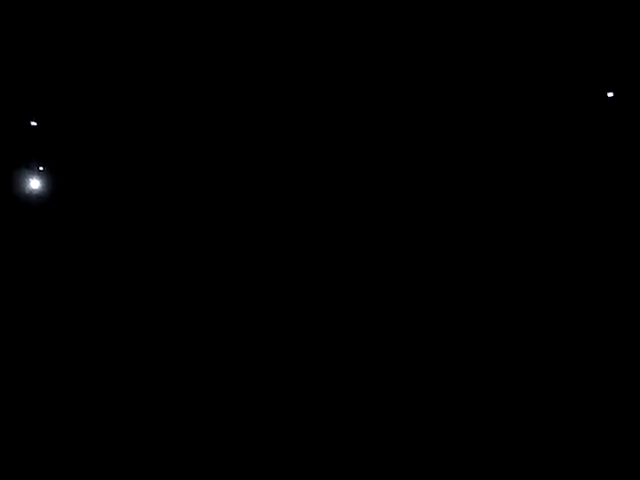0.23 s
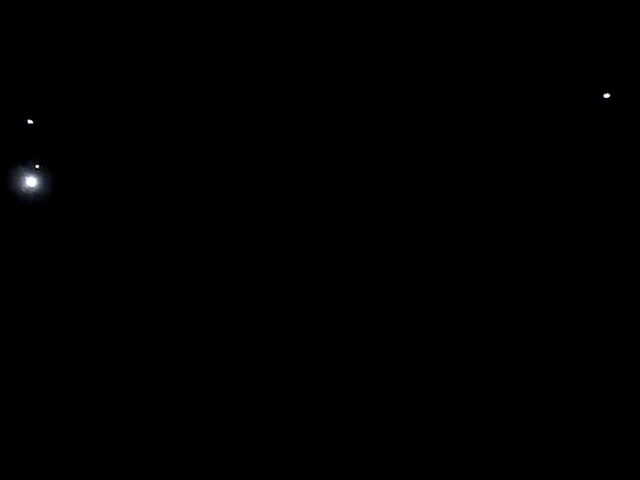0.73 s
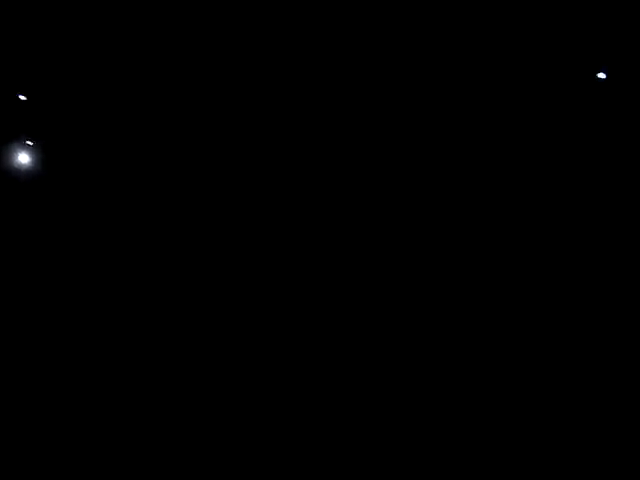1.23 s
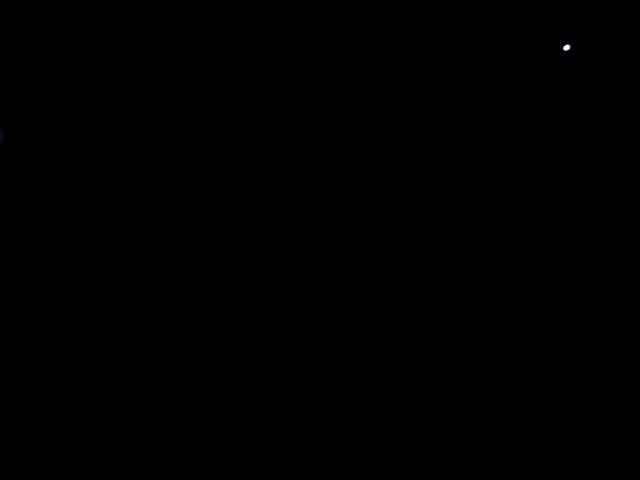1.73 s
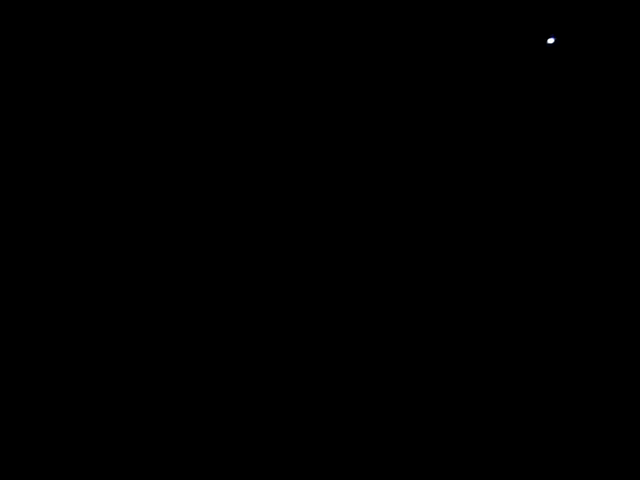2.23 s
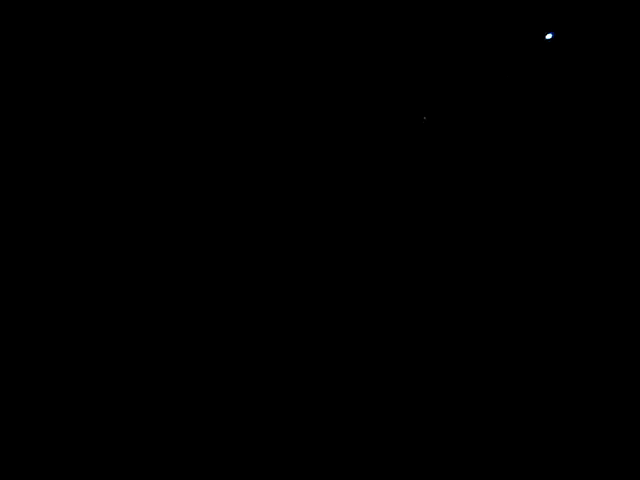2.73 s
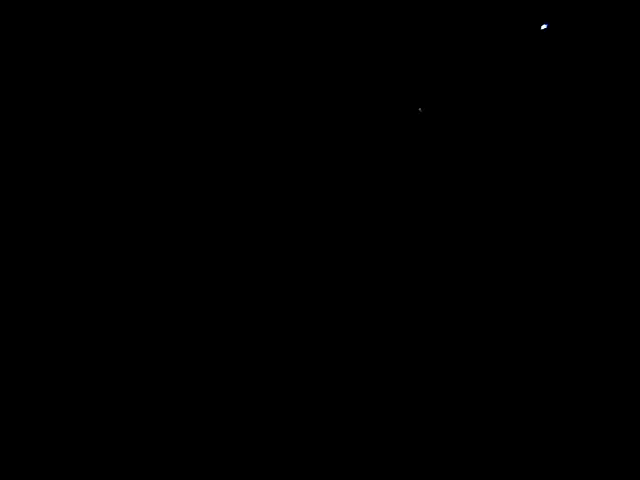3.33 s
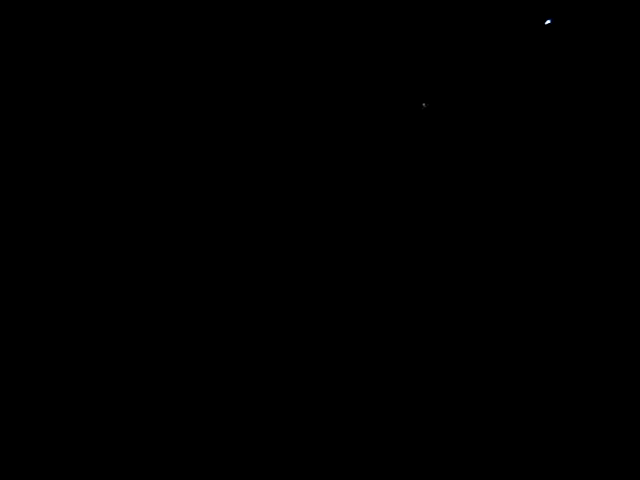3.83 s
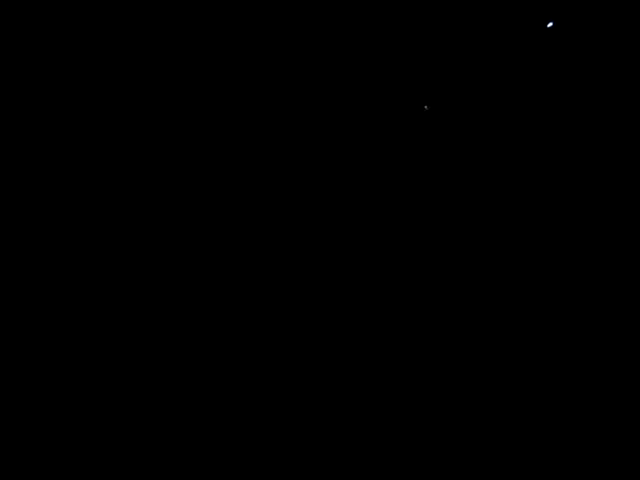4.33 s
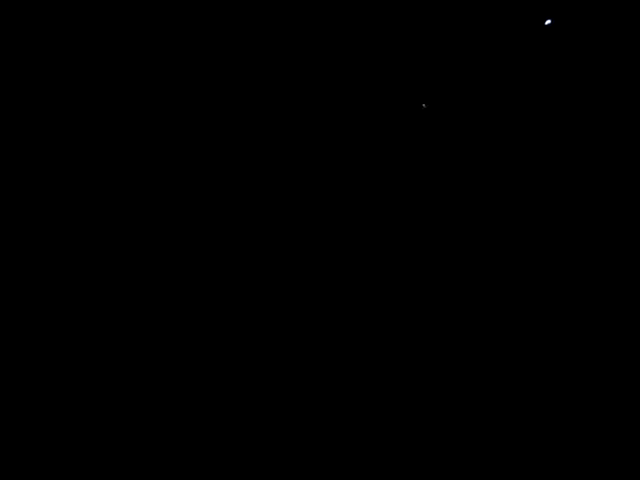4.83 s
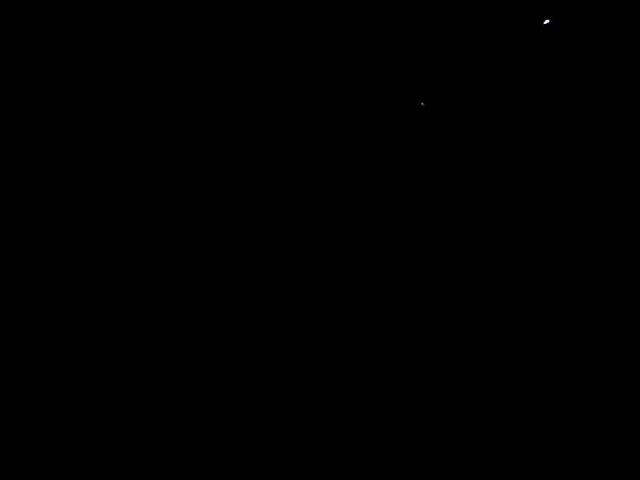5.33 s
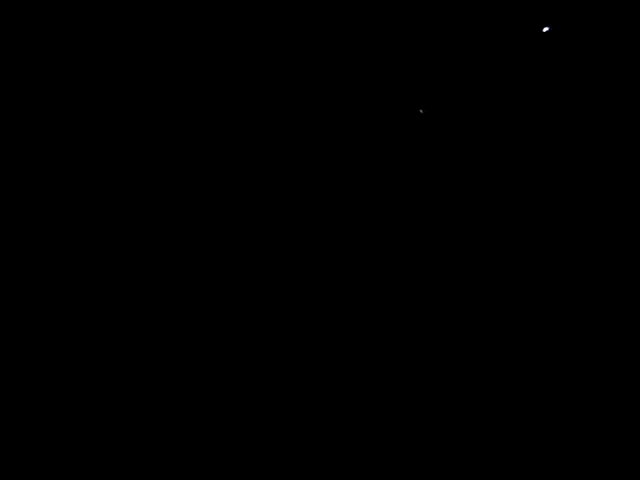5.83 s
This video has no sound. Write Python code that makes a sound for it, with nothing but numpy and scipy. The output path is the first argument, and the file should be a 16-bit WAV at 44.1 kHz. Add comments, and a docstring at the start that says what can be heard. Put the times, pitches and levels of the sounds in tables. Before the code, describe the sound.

High, thin songbird whistles grow louder and break into rapid fluted notes and harsh falling chips, echoing over faint night hiss.

```python
"""Among trees at night, a nightingale sings one strophe: thin whistles that swell and flatten, then a
loud burst of fluted notes and sharp downward chips. Its syrinx is an oscillator of gliding pitch,
and trunks and leaves scatter every note into reverberation. Brief recorder dropouts cut the
whistles and their echoes together. Under the song lie a faint far rumble and hiss, two distant
calls and a few small ticks close by."""
import sys
import numpy as np
from scipy import signal
from scipy.fft import rfft, irfft
from scipy.io import wavfile
from scipy.ndimage import uniform_filter1d

SR = 44100
rng = np.random.default_rng(int(sys.argv[2]) if len(sys.argv) > 2 else 0)


def generate_wav(sig):
    """Save sig (samples, or channels by samples) to the path in sys.argv[1] as 16-bit PCM at SR."""
    pcm = np.round(np.clip(np.atleast_2d(sig).T, -1, 1) * 32767).astype(np.int16)
    wavfile.write(sys.argv[1], SR, pcm)


N = 268260

# Levels in the tables are relative: each source applies its own gain.
# spectrum of the night air: (frequency [Hz], spectral level [dB])
AIR_SPECTRUM = [(15, -54), (25, -20), (85, -8.5), (118, -7.5), (195, -3.5), (257, -4.5), (307, -3),
                (394, -3.5), (519, -6), (651, -4), (3000, -16.5), (3760, -17.5), (6370, -20.5),
                (7780, -22.5), (10000, -27), (13000, -61.5), (22000, -120)]
# narrow bands that stand out of it: (centre [Hz], width [Hz], lift [dB])
DRONES = [(317, 14, 4), (516, 18, 5.5), (805, 50, 3), (7580, 110, 4.5)]
# reverberation of the trees: (frequency [Hz], time to decay by 60 dB [s])
GROVE_DECAY = [(1400, .42), (2500, 0.6), (4000, 0.65), (6000, 0.55), (9000, 0.5)]
# small snaps: (time [s], peak level [dB], treble tilt [dB/octave])
TICKS = [(0.2583, -37, 0.5), (0.4404, -28, 0), (0.832, -40.5, -9), (0.9414, -40.5, -4), (1.7447, -35, 1),
         (1.894, -39, 0), (2.8868, -35, 1.5), (3.032, -39, -1), (3.15, -36, 5), (3.316, -41, -8),
         (3.7548, -39, 0)]
# their spectrum: (frequency [Hz], level [dB])
TICK_SPECTRUM = [(300, -28), (950, -14), (1350, 1.5), (2700, -5), (4000, -16), (6500, -14), (10000, -26)]
# fluted notes: (time [s], length [s], start pitch [Hz], end pitch [Hz], glide time constant [s],
# loudest point [share of length], level [dB])
FLUTED_NOTES = [(4.258, .022, 1950, 1870, .03, .5, -41), (4.278, .025, 1880, 1490, .05, .55, -22.5),
                (4.301, .023, 1440, 1290, .03, .6, -31), (4.42, .035, 3050, 3090, .009, .55, -26),
                (4.457, .032, 3100, 3100, .009, .6, -24), (4.459, .03, 2470, 2560, .03, .5, -13),
                (4.501, .026, 2420, 2530, .015, .5, -11), (4.534, .041, 2420, 2550, .03, .5, -12),
                (4.57, .043, 2520, 2465, .009, .55, -12), (4.726, .06, 4140, 4095, .04, .72, -24.5),
                (4.843, .056, 1420, 2230, .02, .6, -19), (4.891, .015, 1950, 1350, .03, .45, -24.5),
                (4.954, .076, 2920, 2478, .009, .42, -12), (5.079, .012, 1780, 1460, .02, .5, -28),
                (5.101, .012, 1780, 1460, .02, .5, -29), (5.123, .012, 1780, 1460, .02, .5, -28)]
# distant peeps, one distant rasp and the nasal squeak: columns as for the fluted notes
FAR_PEEPS = [(1.07, .025, 2530, 2520, .02, .5, -58), (1.082, .1, 3720, 3690, .02, .5, -57.5)]
FAR_RASP = (1.843, .072, 3000, 2850, .04, .4, -54)
SQUEAK = (4.255, .027, 900, 960, .009, .5, -35)
# harmonics of the squeak: (harmonic number, level [dB])
SQUEAK_HARMONICS = [(3, -0.5), (4, -8.5), (5, -17.5), (6, -22.5), (7, -22), (8, -29), (10, -30)]
# faint rasps among the whistles: (time [s], level [dB])
SCRAPES = [(2.682, -58), (3.183, -54), (3.525, -49), (3.76, -51)]
# thin whistles: (time [s], length [s], start pitch [Hz], top pitch [Hz], climb [share of length],
# bend [exponent], level [dB], swell [dB], final flutter [share of pitch])
WHISTLES = [(1.40, .125, 6400, 6680, .98, 1.0, -57.5, 9, .006),
            (1.526, .141, 6700, 7540, .8, 2.0, -44.5, 2, .026),
            (2.128, .342, 6170, 7400, .92, 1.4, -37.5, 12, .026),
            (2.722, .26, 6150, 6820, .95, 2.4, -27, 13, .028),
            (3.183, .36, 6120, 6370, .56, 1.8, -23, 15, .012),
            (3.757, .381, 6060, 6440, .68, 1.4, -23, 12, .016)]
# recorder dropouts that cut the whistles and their echoes: (time [s], length [s])
DROPOUTS = [(2.78, .008), (2.977, .007), (3.291, .017), (3.317, .01), (3.387, .02), (3.414, .008),
            (3.515, .015), (3.664, .022), (3.747, .011), (4.028, .008), (4.081, .009), (4.141, .011)]
# sharp chips: (time [s], length [s], top pitch [Hz], end pitch [Hz], level [dB], change in the dive [dB])
CHIPS = [(4.777, .039, 5850, 5100, -22, 0), (5.201, .055, 5650, 2650, -18, -2),
         (5.314, .046, 5480, 2900, -18.3, -5.5)]


def gain_of(db):
    """Amplitude ratio: a factor of ten for every 20 dB."""
    return 10 ** (np.asarray(db) / 20)


def unit_rms(x):
    """Normalisation to unit mean power."""
    return x / np.sqrt(np.mean(x ** 2) + 1e-20)


def curve_at(points, hz):
    """Interpolation on a logarithmic frequency axis."""
    f, value = np.transpose(points)
    return np.interp(np.log(hz + 1), np.log(f + 1), value)


def wander(rate_hz):
    """Random modulation: low-pass Gaussian noise of rms 1."""
    hz = np.fft.rfftfreq(N, 1 / SR)
    return unit_rms(irfft(rfft(rng.standard_normal(N)) * np.exp(-(hz / rate_hz) ** 2), N))


def band(x, lo_hz, hi_hz, order):
    """Causal band-pass filtering."""
    return signal.sosfilt(signal.butter(order, [lo_hz, hi_hz], "band", fs=SR, output="sos"), x)


def night_air(level_db=-53, swell_db=.18):
    """Spectrally shaped noise: a steady far rumble and hiss with a few narrow drones."""
    hz = np.fft.rfftfreq(N, 1 / SR)
    drones_db = sum(lift * np.exp(-((hz - f) / width) ** 2) for f, width, lift in DRONES)
    spectrum = rfft(rng.standard_normal(N)) * gain_of(curve_at(AIR_SPECTRUM, hz) + drones_db)
    return gain_of(level_db + swell_db * wander(2.1)) * unit_rms(irfft(spectrum, N))


def ticks(snap_s=.0017, rustle_s=.012, rustle_db=-22):
    """Broadband transients with exponential decay: each a dry snap and a brief rustle."""
    out, t, hz = np.zeros(N), np.arange(2048) / SR, np.fft.rfftfreq(2048, 1 / SR)
    envelope = np.exp(-t / snap_s) + gain_of(rustle_db) * np.exp(-t / rustle_s)
    treble_octaves = np.clip(np.log2((hz + 1) / 1500), 0, 2)
    for start, db, tilt in TICKS:
        snap = np.roll(rng.standard_normal(len(t)) * envelope, SR // 1000)
        snap = irfft(rfft(snap) * gain_of(curve_at(TICK_SPECTRUM, hz) + tilt * treble_octaves))
        at = round(start * SR)
        out[at:at + len(snap)] += gain_of(db) * snap / abs(snap).max()
    return out


def grove(x, tail_db, near_db, near_s, gap_s):
    """Scattering: direct sound, quick echoes from near branches and, after a gap, a tail from trunks."""
    t = np.arange(SR) / SR
    far_echoes = rng.standard_normal(SR) * (rng.random(SR) < 3000 / SR) * (t > gap_s)
    hz, frame_s, spectra = signal.stft(far_echoes, SR, nperseg=256)
    decay = gain_of(-60 * frame_s / curve_at(GROVE_DECAY, hz)[:, None])
    tail = signal.istft(spectra * decay, SR, nperseg=256)[1][:SR]
    near_echoes = rng.choice([-1., 1.], SR) * (rng.random(SR) < 600 / SR) * (t > .002)
    near = near_echoes * np.exp(-t / near_s)
    response = gain_of(tail_db) * tail / np.linalg.norm(tail)
    response += gain_of(near_db) * near / np.linalg.norm(near)
    return x + signal.fftconvolve(x, response)[:N]


def syrinx(contours, harmonics, jitter, jitter_hz, shimmer_db, edge_s):
    """Harmonic oscillation along each contour, randomly modulated in pitch (jitter) and level (shimmer)."""
    out = np.zeros(N)
    tremble, shimmer = jitter * wander(jitter_hz), shimmer_db * wander(jitter_hz)
    for times, hz, db in contours:
        at = np.arange(round(times[0] * SR), round(times[-1] * SR))
        t = at / SR
        phase = 2 * np.pi * np.cumsum(np.interp(t, times, hz) * (1 + tremble[at])) / SR
        to_edge_s = np.minimum(t - times[0], times[-1] - t)
        gate = np.sin(np.pi / 2 * np.clip(to_edge_s / edge_s, 0, 1)) ** 2
        tone = sum(gain_of(harmonic_db) * np.sin(k * phase) for k, harmonic_db in harmonics)
        out[at] += np.sqrt(2) * gate * gain_of(np.interp(t, times, db) + shimmer[at]) * tone
    return out


def note_contour(start, length, start_hz, end_hz, glide_s, loudest, db, ends_db=-11):
    """Exponential relaxation of pitch under one arch of level; gives times, pitch and level."""
    u = np.linspace(0, 1, 64)
    glide = 1 - np.exp(-u * length / glide_s)
    hz = start_hz + (end_hz - start_hz) * glide / glide[-1]
    arch = np.sin(np.pi * np.interp(u, [0, loudest, 1], [0, .5, 1]))
    return start + length * u, hz, db + ends_db * (1 - arch)


def far_calls():
    """Depth of frequency modulation sets two distant calls apart: shallow in a peep, deep in a rasp."""
    peeps = [note_contour(*row) for row in FAR_PEEPS]
    peep = syrinx(peeps, [(1, 0)], jitter=.008, jitter_hz=200, shimmer_db=2.2, edge_s=.01)
    rasp = syrinx([note_contour(*FAR_RASP)], [(1, 0)],
                  jitter=.096, jitter_hz=600, shimmer_db=3, edge_s=.0076)
    return gain_of(-5) * grove(peep + rasp, tail_db=-5, near_db=-4, near_s=.02, gap_s=.01)


def scrapes(length_s=.025, hz=5680):
    """Rapid jitter roughens short tones just under the pitch of the whistles."""
    notes = [note_contour(start, length_s, hz, hz, length_s, .5, db) for start, db in SCRAPES]
    voice = syrinx(notes, [(1, 0)], jitter=.02, jitter_hz=400, shimmer_db=2.2, edge_s=.003)
    return grove(voice, tail_db=-3, near_db=-3, near_s=.05, gap_s=.015)


def whistle_contour(start, length, start_hz, top_hz, climb, bend, db, swell_db):
    """Power-law glide and envelope: a whistle climbs and swells, then sags and fades."""
    loudest, fade_db, sag_hz_per_s = .71, -6, 900
    u = np.linspace(0, 1, 64)
    rise_hz = (top_hz - start_hz) * np.minimum(u / climb, 1) ** bend
    sag_hz = sag_hz_per_s * length * np.maximum(u - climb, 0)
    before, after = np.maximum(1 - u / loudest, 0), np.maximum(u - loudest, 0) / (1 - loudest)
    level_db = db - swell_db * before ** 1.5 + fade_db * after ** 2
    return start + length * u, start_hz + rise_hz - sag_hz, level_db


def fraying(clean=.0055):
    """Depth of frequency modulation, as a share of pitch: it grows through each whistle."""
    t, flutter = np.arange(N) / SR, np.full(N, clean)
    for start, length, *_, frayed in WHISTLES:
        u = np.clip((t - start) / length, 0, 1)
        flutter += (frayed - clean) * u ** 2.8 * (u < 1)
    return flutter


def dropouts(depth=.97, random_per_s=6, mean_random_s=.005):
    """Amplitude gating: the recorder's gain drops out briefly, at the listed times and at random."""
    t, gain = np.arange(N) / SR, np.ones(N)
    random_dropouts = [((k + place) / random_per_s, mean_random_s * (.5 + size))
                       for k, (place, size) in enumerate(rng.random(size=(80, 2)))]
    for centre, length in DROPOUTS + random_dropouts:
        near = slice(*np.searchsorted(t, [centre - length, centre + length]))
        gain[near] *= 1 - depth * np.exp(-(2 * (t[near] - centre) / length) ** 6)
    return gain


def whistles():
    """Resonance and interference: thin tones pass a tightly tuned throat and beat against their echoes."""
    notes = [whistle_contour(*row[:-1]) for row in WHISTLES]
    voice = syrinx(notes, [(1, 0)], jitter=fraying(), jitter_hz=340, shimmer_db=1.9, edge_s=.0017)
    voice = band(voice, 5800, 8400, order=6) + gain_of(-23.5) * voice
    return gain_of(-3) * grove(voice, tail_db=-6, near_db=-5, near_s=.053, gap_s=.015) * dropouts()


def chip_contour(start, length, top_hz, end_hz, db, dive_db):
    """A frequency sweep under one arch of level: a small upward hook, then a steep dive."""
    hook_hz, ends_db, dive_from, dive_to = 400, -8, .29, .93
    u = np.linspace(0, 1, 64)
    hook = np.maximum(1 - u / dive_from, 0) ** 2
    dive = np.sin(np.pi / 2 * np.clip((u - dive_from) / (dive_to - dive_from), 0, 1)) ** 2
    arch = np.sin(np.pi * u ** 1.05)
    hz = top_hz - hook_hz * hook + (end_hz - top_hz) * dive
    return start + length * u, hz, db + ends_db * (1 - arch) + dive_db * dive


def roughen(x, width_hz, noise_share):
    """Chaotic vibration spreads a tone into sidebands that follow its pitch."""
    low_pass = 1 / (1 + (2 * np.fft.fftfreq(N, 1 / SR) / width_hz) ** 8)
    chaos = np.fft.ifft((rng.standard_normal(N) + 1j * rng.standard_normal(N)) * low_pass)
    sidebands = (signal.hilbert(x) * chaos / chaos.std()).real
    return np.sqrt(1 - noise_share) * x + np.sqrt(noise_share) * sidebands


def chips():
    """Noise modulation makes harsh plunges: a diving, rasping band, with hiss that follows its envelope."""
    notes = [chip_contour(*row) for row in CHIPS]
    voice = syrinx(notes, [(1, -1), (2, -34)], jitter=.022, jitter_hz=600, shimmer_db=1.5, edge_s=.0025)
    voice = roughen(voice, width_hz=1500, noise_share=.8)
    envelope = np.sqrt(abs(uniform_filter1d(voice ** 2, size=200)))
    hiss = gain_of(-23) * envelope * unit_rms(band(rng.standard_normal(N), 2600, 12000, order=2))
    return gain_of(-3) * grove(voice + hiss, tail_db=-4.5, near_db=-3.5, near_s=.024, gap_s=.021)


def fluted_burst():
    """Harmonic balance sets timbre: an overtone-rich nasal squeak opens a run of round, near-pure notes."""
    flutes = syrinx([note_contour(*row) for row in FLUTED_NOTES], [(1, -2.5), (2, -43), (3, -56)],
                    jitter=.01, jitter_hz=305, shimmer_db=2, edge_s=.003)
    squeak = syrinx([note_contour(*SQUEAK)], SQUEAK_HARMONICS,
                    jitter=.012, jitter_hz=400, shimmer_db=2, edge_s=.003)
    flutes = grove(flutes, tail_db=-12, near_db=-6, near_s=.028, gap_s=.034)
    return flutes + gain_of(2) * grove(squeak, tail_db=-3, near_db=-2.5, near_s=.031, gap_s=.015)


def scene():
    """Superposition of the song and the quiet night, in one channel."""
    return (night_air() + whistles() + fluted_burst() + chips() + far_calls() + ticks() + scrapes())[None]


def record(dry):
    """Band limiting: a steep linear-phase low-pass removes the highest treble."""
    low_pass = signal.firwin(701, cutoff=10110, window=("kaiser", 9), fs=SR)
    return signal.oaconvolve(dry, low_pass[None], "same")


dry = scene()
out = record(dry)
generate_wav(out)
```